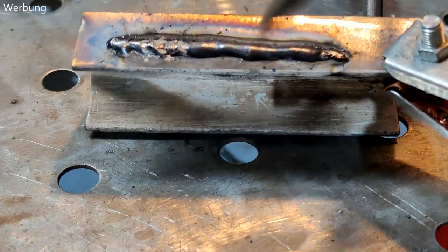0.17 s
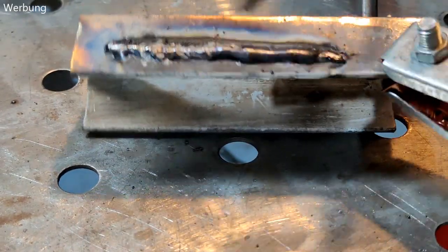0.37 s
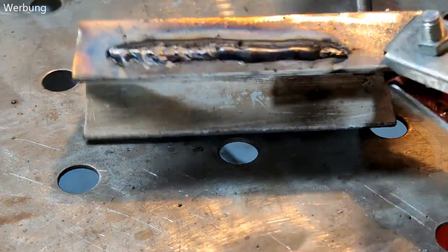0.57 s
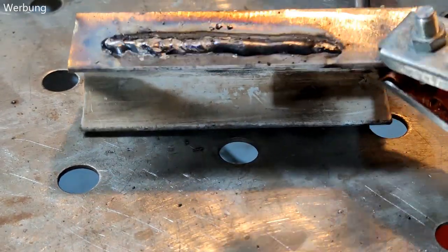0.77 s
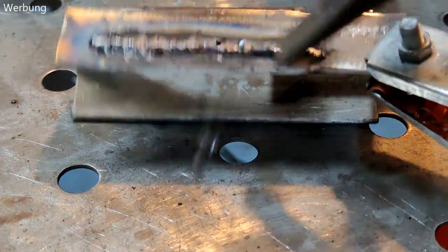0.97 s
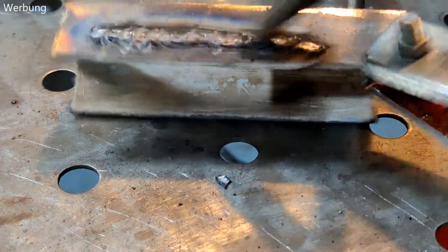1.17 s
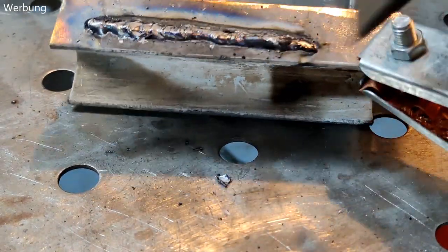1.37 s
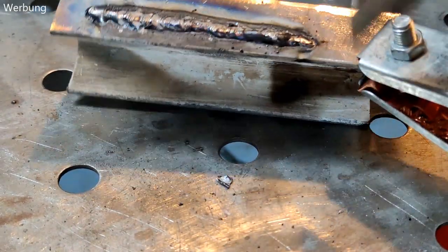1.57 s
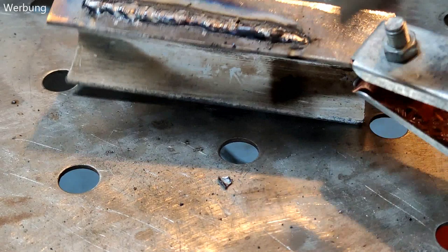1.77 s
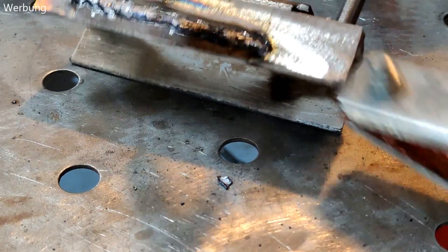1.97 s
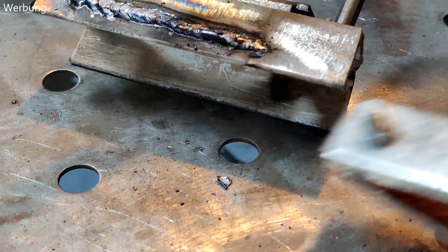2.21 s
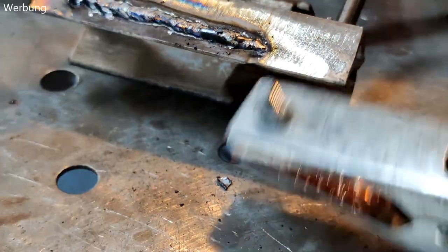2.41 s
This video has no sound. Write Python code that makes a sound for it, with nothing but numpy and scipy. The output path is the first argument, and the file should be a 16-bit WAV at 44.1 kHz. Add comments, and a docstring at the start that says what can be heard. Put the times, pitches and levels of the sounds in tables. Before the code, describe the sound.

A chipping hammer strikes a small loose steel beam on a steel bench in hard, clattering blows.

```python
"""Faint ticks in quiet workshop air, then hard ringing blows: a chipping hammer taps a small steel beam
that lies loose on a thick steel bench. Each blow cracks, sets the bench clattering (shaped noise) and
rings bench and beam (dying sine tones); the beam hops and lands again, and slag chips tick.
The jolt makes the microphone lurch (a slow swing), and near the end a clamp snaps off the beam."""
import sys
import numpy as np
from scipy import signal
from scipy.fft import rfft, irfft
from scipy.io import wavfile
from scipy.ndimage import uniform_filter1d, minimum_filter1d

SR = 44100
rng = np.random.default_rng(int(sys.argv[2]) if len(sys.argv) > 2 else 0)


def file_out(sig):
    """Save sig as 16-bit WAV at sys.argv[1]."""
    # one column per channel
    cols = np.atleast_2d(sig).T
    # limit, then scale
    lim = np.clip(cols, -1, 1)
    pcm = np.round(lim * 32767).astype(np.int16)
    wavfile.write(sys.argv[1], SR, pcm)


N = 108045  # samples in the scene

CLATTER_TRIM_DB = -5.5  # added to every clatter and bench ring
CRACK_T60_S = 0.025  # time for a crack to fall by 60 dB

# The hammer blows. Each row: start in seconds, clatter level in dB before the trim, then seven bands in dB
# against it (rumble, bass, low mid, mid, upper mid, treble, top), beam ring in dB before its trim,
# beam pitch as a share of its normal pitch, extra delay of the beam in seconds, bench hum in dB,
# crack in dB against the clatter, clatter 60 dB fall time in seconds before the band shares,
# time to bite into the slag in seconds, lurch in dB, and left minus right level in dB.
BLOWS = [(0.2163, -2.5, -30.5, -33, -32, -19, -14.5, -11.5, -24.5, -13.5, 1, 0.0011, -35.5, 6, .23, 0.00088, -37, 1),
         (0.433, -4.5, -33, -35.5, -28, -18.5, -11, -9.5, -22, -11.5, .999, 0.00063, -45, 6.5, 0.25, .0006, -23, 1.3),
         (0.6728, -5.5, -27.5, -29, -27, -20, -12, -13, -22.5, -5.5, 1.016, 0.00012, -39.5, 8, 0.22, .0021, -47, 0),
         (0.8703, -8.5, -34, -29, -24, -17.5, -11, -9.5, -19.5, -13, 1, 0.0006, -39, 12, 0.32, 0.00068, -19, 0.5),
         (1.118, -8.5, -26.5, -25.5, -26, -19, -16, -7.5, -20.5, -26.5, .999, 0.00077, -43, 10.5, 0.29, 0.0016, -20.5, 4),
         (1.3918, 0.5, -32, -22, -24.5, -17, -12, -10, -19, -17, 1.006, 0.0037, -29, -6, 0.25, 0.00092, -32, 1.4),
         (1.6381, -1, -36.5, -31, -28.5, -18.5, -14, -14.5, -20, -16.5, .995, 0.00091, -44, 1.5, 0.23, .0004, -31, 3),
         (1.8515, 1.16, -32.5, -31.5, -26.5, -19.5, -15.5, -16.5, -22.5, -13.5, 1.07, 0.00049, -46.5, 2, .26, 0.00042, -34, 0.6),
         (2.0607, -2.15, -31.5, -28, -20, -13.5, -12, -10, -15, -21, 1.005, 0.0077, -33.5, -8, .25, 0.0016, -45, 2.8),
         (2.235, -21, -16.5, -20, -10.5, -10.5, -6, -8, -14, -49, 0.69, 0.00085, -31, -10, 0.25, 0.00033, -49, 0.5)]


def hammer_blows(mix):
    """Each blow starts the clatter; once the hammer has bitten through, bench and beam ring and the jolt begins."""
    for (s, db, *band_db, beam_db, pitch, late_s, hum_db, crack_db, t60, bite_s,
         lurch_db, pan_db) in BLOWS:
        pan = amp([[pan_db / 2], [-pan_db / 2]])
        bench = pan * ring(db + CLATTER_TRIM_DB, band_db, hum_db)
        add(mix, s, pan * clatter(db, band_db, crack_db, CRACK_T60_S, t60, bite_s))
        add(mix, s + bite_s, bench + lurch(lurch_db))
        add(mix, s + bite_s + late_s, pan * beam(beam_db, pitch))


GRAIN_DB = 1  # typical size of the fast level flicker
AFTER_RING_DB, AFTER_RING_T60_S = -23.5, 0.44  # long faint after-ring of the shop
RATTLE_DB, RATTLE_WIDEN = 0.5, 4.56  # how much, and how broadly, the clatter feeds the modes
SHARPEST_S = 0.0002  # shortest allowed rise

# The clatter bands, from rumble to top: the centre of each in Hz.
BANDS_HZ = [70, 200, 450, 1100, 3200, 6300, 12000]
# How long each band rings, as a multiple of the clatter fall time.
BAND_T60_SHARE = [1.5, 1.57, 1.316, 1.257, 0.95, 0.87, 0.83]
# How slowly each band rises, in seconds, before the bite or landing time is added.
BAND_RISE_S = [0.0046, 0.0031, 0.0038, 0.001, 0.00093, .0006, 0.00024]
# How strong the crack is in each band, in dB added to its own level.
BAND_CRACK_DB = [-12, -2.5, -6, -13.5, -2.5, 8.1, -4]
# Tone colour inside the bands, before each is evened out. Each row: frequency in Hz, level in dB per Hz.
COLOUR = [(35, -49), (60, -17.5), (219, -6), (393, -13), (777, -11.5), (895, -11), (1650, -4), (1810, -6),
          (2040, -9.5), (2770, -8), (6920, 12), (8150, 2), (14000, -14), (15400, -15), (16500, -63)]


def clatter(db, band_db, crack_db, crack_t60, t60, rise_s):
    """Dense modes of the bench: noise whose bands rise and die at their own speed, in grains."""
    size = 2 ** 15
    t = np.arange(size) / SR
    hz, spectrum = pair_noise(size)
    peaks = sum(1 / (1 + ((hz - mode_hz) * mode_t60 / RATTLE_WIDEN) ** 2)
                for mode_hz, _, mode_t60 in BENCH_MODES + BEAM_MODES)
    spectrum = spectrum * amp(read_curve(COLOUR, hz)) * (1 + amp(RATTLE_DB) * peaks)
    after_ring = amp(AFTER_RING_DB - 60 * t / AFTER_RING_T60_S)
    grain = uniform_filter1d(rng.standard_normal(size), size=60)
    out = 0
    for k in range(len(BANDS_HZ)):
        # Each band fades into its neighbours.
        only_this_band = np.eye(len(BANDS_HZ))[k]
        band = irfft(spectrum * read_curve(list(zip(BANDS_HZ, only_this_band)), hz))
        fall = amp(-60 * t / (t60 * BAND_T60_SHARE[k])) + after_ring
        crack = amp(crack_db + BAND_CRACK_DB[k] - 60 * t / crack_t60)
        rise = 1 - np.exp(-(t / max(BAND_RISE_S[k] + rise_s, SHARPEST_S)) ** 2)
        out = out + amp(band_db[k]) * band / band.std() * (fall + crack) * rise
    return amp(db + CLATTER_TRIM_DB + GRAIN_DB * grain / grain.std()) * out


BENCH_HUM_HZ, BENCH_HUM_T60_S, BENCH_HUM_RISE_S = 226.5, 0.46, 0.0045
MODE_SPREAD_DB = 2.5  # typical change of a mode from blow to blow
CONTACT_S = 0.00078  # rise time of the ringing tones

# The clearest tones of the bench. Each row: frequency in Hz, level in dB before the blow's own levels,
# time to fall by 60 dB in seconds.
BENCH_MODES = [(132.7, 4.5, 0.14), (765, 1, 0.044), (863, -11.5, 0.25), (1023, -11, 0.38),
               (1188, 3.5, 0.099), (1393, -0.5, 0.092), (1500, -16, .65), (1702, -16, 0.36),
               (3088, -1.5, 0.054), (3410, -11.5, 0.11), (3830, -9, 0.22), (5160, -1.5, 0.073),
               (6256, -12, 0.065), (6440, -4.5, 0.089), (7150, -20, 0.11)]


def ring(db, band_db, hum_db):
    """The clearest modes of the bench, over a low hum; each blow finds another spot."""
    t = np.arange(2 ** 15) / SR
    hum_level = amp(hum_db - 60 * t / BENCH_HUM_T60_S) * (1 - np.exp(-t / BENCH_HUM_RISE_S))
    out = hum_level * both_ports(BENCH_HUM_HZ, t, 0, 0)
    for hz, mode_db, t60 in BENCH_MODES:
        spot, start, turn = rng.standard_normal(3)
        blow_db = db + read_curve(list(zip(BANDS_HZ, band_db)), hz)
        fall = amp(mode_db + blow_db + MODE_SPREAD_DB * spot - 60 * t / t60)
        out = out + fall * waver(len(t)) * both_ports(hz, t, start, turn)
    return out * (1 - np.exp(-(t / CONTACT_S) ** 2))


BEAM_TRIM_DB = 2
FREE_S, DAMPED_DB = 0.011, -11.5  # free ringing time, then the drop as the beam meets the bench

# The tones of the beam. Each row: frequency in Hz at normal pitch, level in dB before the ring's own level,
# time to fall by 60 dB in seconds.
BEAM_MODES = [(1997, 0.5, 0.17), (2091, -2, 0.18), (2096, -13.5, 0.053), (2180, -11, .1),
              (2297, -20.5, 0.056), (2405, -14.5, 0.18), (2565, -22.5, 0.018)]


def beam(db, pitch):
    """Close modes swell together, ring freely for a moment, then the bench damps them."""
    t = np.arange(2 ** 14) / SR
    out = 0
    for k, (hz, mode_db, t60) in enumerate(BEAM_MODES):
        fall = amp(mode_db - 60 * t / t60) * waver(len(t))
        # Neighbouring tones start in opposite directions.
        out = out + fall * both_ports(hz * pitch, t, np.pi * k, 0.13 * rng.standard_normal())
    damping_db = DAMPED_DB / (1 + np.exp((FREE_S - t) / 0.0029))
    return amp(db + BEAM_TRIM_DB + damping_db) * out * (1 - np.exp(-(t / CONTACT_S) ** 2))


WAVER_DB, WAVER_S = 3.5, 0.009  # depth scale, and length of each of two smoothings


def waver(size):
    """Loose contact makes a ring swell and fade at random once the first instant is past."""
    smooth = round(WAVER_S * SR)
    slow = uniform_filter1d(uniform_filter1d(rng.standard_normal(size), size=smooth), size=smooth)
    fade_in = np.clip(np.arange(size) / SR / FREE_S - 1, 0, 1)
    return amp(WAVER_DB * np.minimum(slow / slow.std() - 0.5, 0.5) * fade_in)


LURCH_HZ, LURCH_T60_S, LURCH_LEAN_DB = 4.4, 0.59, 2  # left is turned down and right up by the lean


def lurch(db):
    """The jolt through the bench: a slow dip and swing back."""
    t = np.arange(2 ** 15) / SR
    swing = np.cos(2 * np.pi * LURCH_HZ * t) * (1 - np.exp(-t / 0.00266))
    return -amp(db - 60 * t / LURCH_T60_S) * swing * amp([[-LURCH_LEAN_DB], [LURCH_LEAN_DB]])


LANDING_RISE_S, LANDING_RING_DB = 0.005, -14

# The beam landing again, and slag chips. Each row: start in seconds, clatter level in dB before the trim,
# then changes in dB to the four lowest bands, the treble and the top, beam ring in dB against
# the clatter before the ring trims, clatter 60 dB fall time in seconds before the band shares.
LANDINGS = [(.03, -48, -22, -1, -12, -35, 0.082), (0.0783, -45, -32, 5.5, -11, -35, 0.12),
            (.15, -65, -24, -4, -24, -35, .12), (0.323, -27, -16, -12, -34.5, -16, 0.17),
            (.538, -20.5, -13.5, -13, -26.5, -9, 0.28), (0.781, -24, -15, -17.5, -31, -1, .2),
            (.823, -26, -16, -16, -30.5, -7, 0.088), (0.978, -22, -12.5, -12.5, -30, -4, 0.26),
            (1.222, -24.5, -9.5, -3.5, -27.5, -11, 0.19), (1.258, -30, -10.5, -6.5, -21.5, -30, 0.29),
            (1.595, -44, -26, -2, -7.5, -11, 0.12), (1.729, -21.5, -13.5, -15, -27.5, -25, 0.25),
            (1.95, -24, -11, -12.5, -25, -15, 0.32), (2.0495, -33.5, -18.5, -5, -17, -29, 0.13),
            (2.187, -38.5, 2, -20, -30, -31, 0.24)]
# Shared colour of the landings: one level in dB per clatter band, before each row's changes.
LANDING_BAND_DB = [-9, -1.5, -7, -4, -8.5, 3.5, 7]


def landings(mix):
    """A small impact: a softly starting clatter almost without crack, then a slightly lower beam ring."""
    for s, db, lows_db, treble_db, top_db, beam_db, t60 in LANDINGS:
        band_db = np.add(LANDING_BAND_DB, [lows_db] * 4 + [0, treble_db, top_db])
        add(mix, s, clatter(db, band_db, -90, CRACK_T60_S, t60, LANDING_RISE_S))
        add(mix, s + LANDING_RISE_S, beam(db + beam_db + LANDING_RING_DB, 0.96))


SNAP_S, SNAP_CRACK_DB, SNAP_CRACK_T60_S = 2.1552, 19.5, 0.0074  # crack is against the tail
SNAP_TAIL_DB, SNAP_TAIL_T60_S = -19.5, 0.25  # before the clatter trim and band shares

# Colour of the clamp snap: one level in dB per clatter band, against its tail.
SNAP_BANDS_DB = [-36.5, -33.5, -23.5, -15, -7, -4, -12]


def clamp_snap(mix):
    """The clamp snaps off the beam: a strong short crack over a weaker clatter."""
    # The negative rise makes every band start as sharply as allowed.
    snap = clatter(SNAP_TAIL_DB, SNAP_BANDS_DB, SNAP_CRACK_DB, SNAP_CRACK_T60_S, SNAP_TAIL_T60_S, -1)
    add(mix, SNAP_S, snap)


FLOOR_DB = -53  # overall level of the air

# Colour of the workshop air, before its level is set. Each row: frequency in Hz, level in dB per Hz.
FLOOR = [(15, 14), (30, 5.5), (100, -2), (230, -15), (500, -19), (1500, -24.5), (4000, -23.5),
         (6800, -20.5), (8600, -28), (16000, -33)]


def shop():
    """Quiet air of the workshop: steady coloured noise."""
    hz, spectrum = pair_noise(N)
    air = irfft(spectrum * amp(read_curve(FLOOR, hz)), N)
    return amp(FLOOR_DB) * air / air.std()


LEAD_S = 7e-5  # left hears first

# How alike left and right are. Each row: frequency in Hz, likeness from 0 to 1.
SAME = [(60, 1), (300, 0.98), (700, 0.34), (2000, 0.29), (5000, 0.3), (14000, 0.18)]
# Balance of the two sides. Each row: frequency in Hz, left minus right level in dB.
TILT = [(30, -2.5), (125, -3), (1000, 1.5), (3000, -3.5), (8000, 0.5), (13000, -6)]


def pair_noise(size):
    """Spectrum of two partly alike white noises, the left slightly ahead."""
    hz = np.fft.rfftfreq(size, 1 / SR)
    a, b = rfft(rng.standard_normal((2, size)))
    same = np.clip(read_curve(SAME, hz), 0, 1)
    tilt = amp(read_curve(TILT, hz) / 2)
    delay = np.exp(-2j * np.pi * hz * LEAD_S)
    right = (same * a + np.sqrt(1 - same ** 2) * b) * delay / tilt
    return hz, np.array([a * tilt, right])


def both_ports(hz, t, start, turn):
    """One steady tone as the two microphone ports meet it, with a delay and phase turn on the right."""
    right_lag = 2 * np.pi * hz * LEAD_S + turn * (1 - read_curve(SAME, hz))
    lag = np.array([[0], [right_lag]])
    balance = amp(read_curve(TILT, hz) / 2 * np.array([[1], [-1]]))
    return balance * np.sin(2 * np.pi * hz * t - lag + start)


def amp(db):
    """Turn decibels into an amplitude factor."""
    return 10 ** (np.asarray(db) / 20)


def read_curve(points, hz):
    """Read a curve of (Hz, value) points between its points, along a log frequency scale."""
    f, value = np.transpose(points)
    return np.interp(np.log(hz + 1), np.log(f + 1), value)


def add(mix, s, sound):
    """Add a sound to the mix from second s, cut off at the end of the mix."""
    part = mix[:, round(s * SR):][:, :sound.shape[1]]
    part += sound[:, :part.shape[1]]


def scene():
    """Lay the blows, landings and clamp snap over the workshop air."""
    mix = shop()
    hammer_blows(mix)
    landings(mix)
    clamp_snap(mix)
    return mix


LOOK_AHEAD_S, KNEE_DB, SQUEEZE = 0.0085, -17.5, 0.12  # squeeze: share of the dB above the knee removed
CEILING, EDGE_HZ = 0.95, 16750  # overload limit before the band limit, and its cutoff


def record(dry):
    """A limiter that looks ahead dips the level just before each blow; soft overload; then the band limit."""
    power = abs(uniform_filter1d((dry ** 2).mean(0), size=90))
    power_db = 10 * np.log10(power + 1e-12)
    # The loudest moment nearby, looking both ahead and back (the two minus signs turn minimum into maximum).
    peak_db = -minimum_filter1d(-power_db, size=2 * round(LOOK_AHEAD_S * SR) + 1)
    over_db = uniform_filter1d(np.maximum(peak_db - KNEE_DB, 0), size=90)
    held = dry / amp(SQUEEZE * over_db)
    overloaded = CEILING * np.tanh(held / CEILING)
    low_pass = signal.firwin(511, EDGE_HZ, window=("kaiser", 9), fs=SR)
    return signal.oaconvolve(overloaded, low_pass[None], "same")


dry = scene()
out = record(dry)
file_out(out)
```